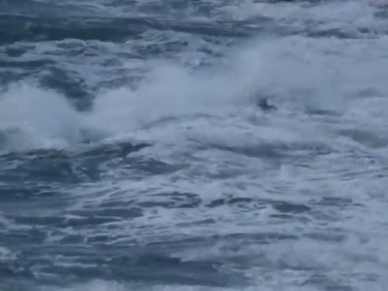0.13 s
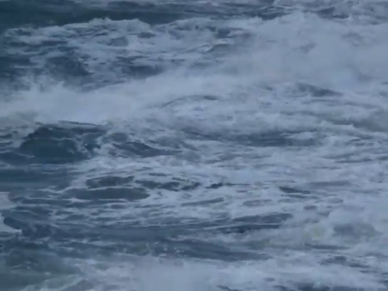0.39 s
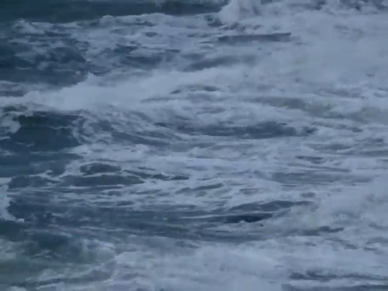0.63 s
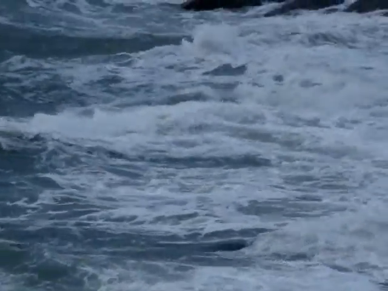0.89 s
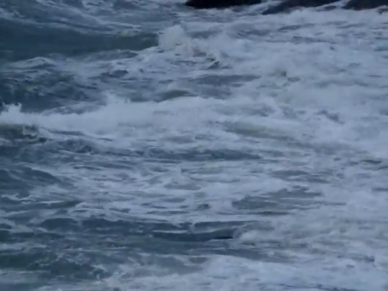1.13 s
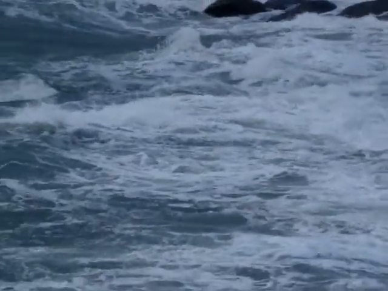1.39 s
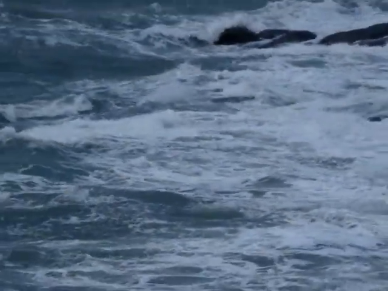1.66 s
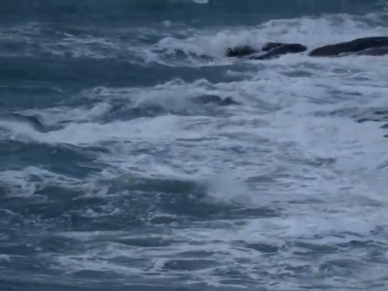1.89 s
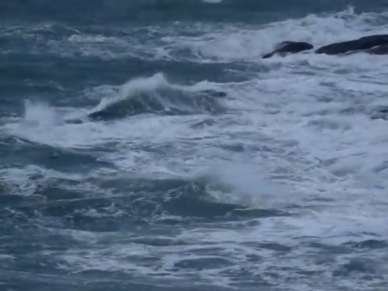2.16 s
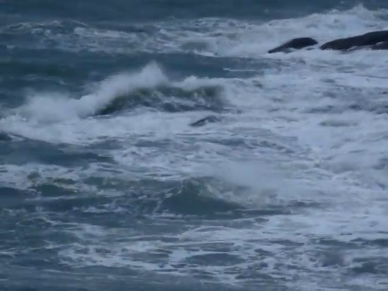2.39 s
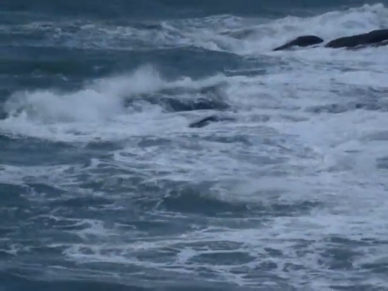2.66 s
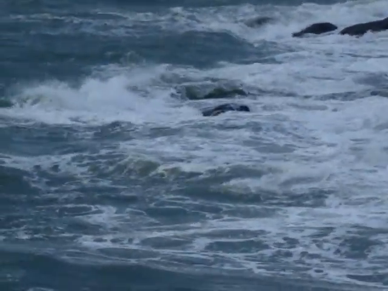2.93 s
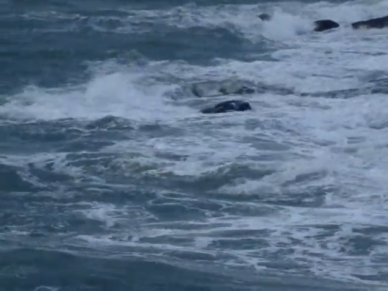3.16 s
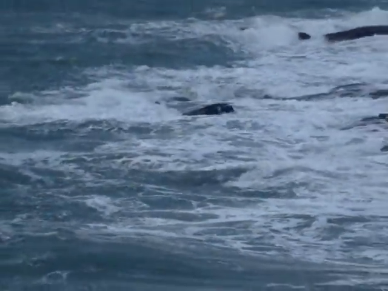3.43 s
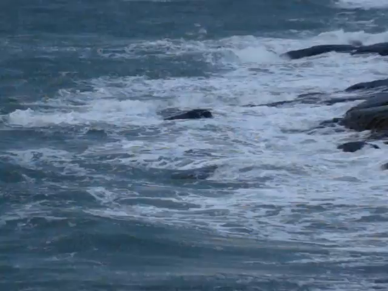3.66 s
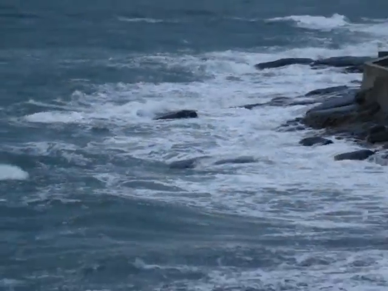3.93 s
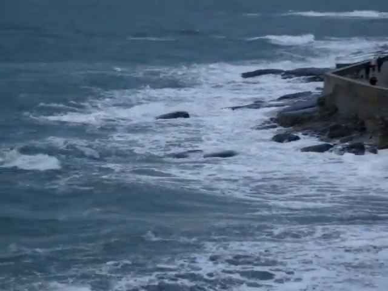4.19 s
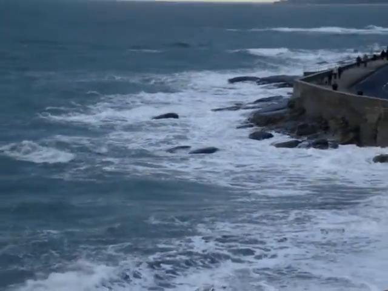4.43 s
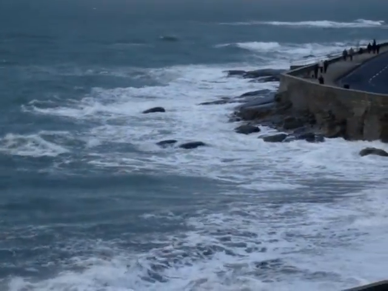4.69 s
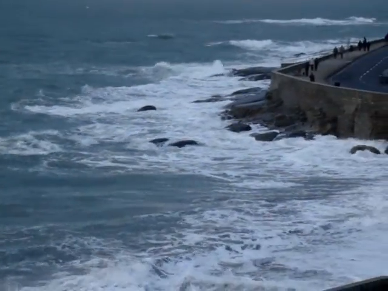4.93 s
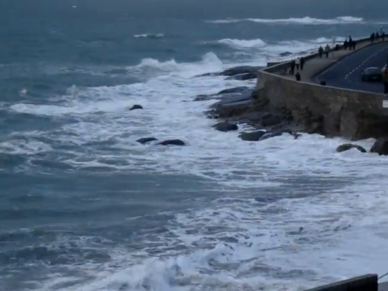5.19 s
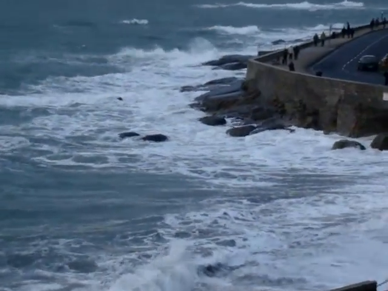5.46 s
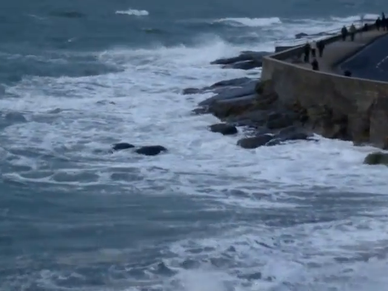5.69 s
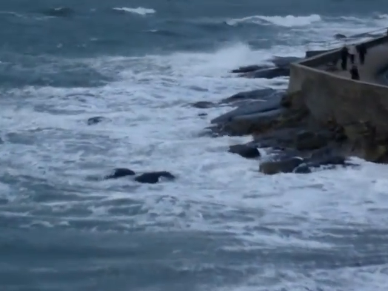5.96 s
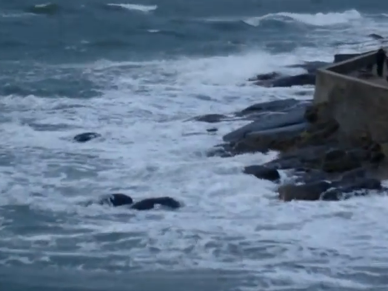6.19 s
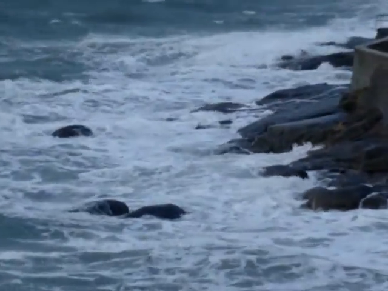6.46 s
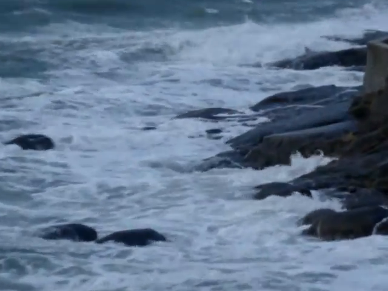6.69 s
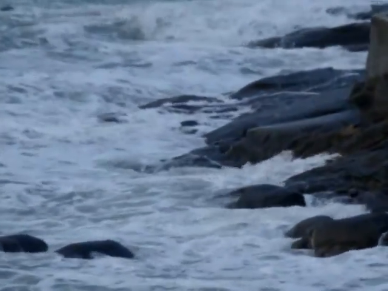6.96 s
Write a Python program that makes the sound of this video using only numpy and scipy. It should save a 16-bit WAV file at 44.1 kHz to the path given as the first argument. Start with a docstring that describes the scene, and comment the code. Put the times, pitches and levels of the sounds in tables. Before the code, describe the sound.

Outdoors on a rough shore, distant waves foam over rocks as a continuous, wide-band hiss, flickering slightly and swelling slowly, with no separate wave crash. For the first 1.5 seconds the surf is alone. Faint wind puffs follow, and from about 2.2 to 2.5 seconds a gust strikes the microphone with lumpy low roar and quick pops; another hits at 2.6 to 2.75. Brief puffs come near 3.1, then dense buffeting and hard pops from 3.3 to 3.7, fading by 3.9. Surf hiss leads again until 5.3, swelling a little just before. Strong pops strike around 5.4 to 5.5, then the heaviest, brighter, fuller roar holds from about 5.65 to 6.15. Shorter gusts thump around 6.2, 6.45 to 6.55 and 6.8 to 7.05. The sound is centred, with little deep rumble, soft overload on the biggest pops and muted extreme treble.

```python
"""Surf and wind gusts at a sea wall

Rough surf breaks and foams over rocks below a sea wall, heard from afar as a wide, swelling hiss:
noise coloured and levelled frame by frame. Gusts of wind strike the single small microphone:
thousands of overlapping pressure swings make a lumpy roar, and single large ones make sharp pops."""
import sys
import numpy as np
from scipy import signal
from scipy.io import wavfile
from scipy.ndimage import uniform_filter1d

SR = 44100
rng = np.random.default_rng(int(sys.argv[2]) if len(sys.argv) > 2 else 0)


def int16_out(signal):
    """Quantize to a 16-bit WAV file."""
    q = np.round(np.clip(np.atleast_2d(signal).T, -1, 1) * 32767)
    wavfile.write(sys.argv[1], SR, q.astype(np.int16))


def magnitude_from_level(level_db):
    """Linear magnitude for a level in decibels (20 dB per decade)."""
    exponent = np.asarray(level_db, float) / 20
    return 10 ** exponent


N = 312669  # samples

# single large eddies: (time [s], size before the swing and the port [dB], swing rate [Hz])
LARGE_EDDIES = [(2.225, -6.5, 860), (2.239, -4, 510), (2.307, -2, 440), (2.336, -3, 380), (2.374, -5, 450),
                (2.39, -6, 650), (2.427, -11, 400), (2.603, -11, 660), (2.628, 0.5, 640), (2.672, -4, 600),
                (2.714, -7.5, 600), (3.106, -9, 325), (3.153, -3, 404), (3.349, -3.5, 507),
                (3.412, -5, 330), (3.471, -2.5, 620), (3.483, -4, 520), (3.522, 3, 637), (3.554, -5, 430),
                (3.558, -5, 1400), (3.567, -6, 400), (3.584, -6, 660), (3.637, -13, 497), (3.802, -18, 300),
                (3.868, -22, 400), (5.414, 1, 520), (5.466, 5, 780), (5.509, -5, 377), (5.633, -1, 835),
                (5.676, -2.5, 650), (5.692, -6, 440), (5.731, -1, 630), (6.118, -17, 800), (6.225, -2, 950),
                (6.373, -16, 450), (6.437, -14, 420), (6.479, -1, 390), (6.511, -18, 600), (6.54, 1, 780),
                (6.581, -5.5, 750), (6.863, -15, 650), (6.908, -7, 500), (6.984, -13, 620),
                (7.044, -21, 300)]


def evened(x):
    """Normalisation: scales a signal to rms 1."""
    return x / np.sqrt(np.mean(x ** 2) + 1e-20)


def wander(t, low_hz, high_hz):
    """Superposition: slow sines of random phase, weaker with rising rate, add to a chance curve of rms 1."""
    rates = np.geomspace(low_hz, high_hz, num=30)
    return evened(sum(np.sin(2 * np.pi * (f * t + rng.random())) / np.sqrt(f) for f in rates))


def scatter(s, size, width_s, swing_hz, phase):
    """Superposition of pulses: adds one bell-shaped pressure swing at each time s."""
    step = np.arange(-350, 350)
    t = step / SR
    bells = np.exp(-0.5 * (t / width_s[:, None]) ** 2)
    swings = bells * np.cos(2 * np.pi * swing_hz[:, None] * t + phase[:, None])
    at = np.clip(np.round(s * SR).astype(int)[:, None] + step, 0, N - 1)
    return np.bincount(at.ravel(), (size[:, None] * swings).ravel(), N)


def through_port(x):
    """High-pass response: the microphone loses the bass of pressure swings."""
    port_hz = 173
    return signal.sosfilt(signal.butter(2, port_hz, "high", fs=SR, output="sos"), x)


def surf():
    """Random superposition: countless bursting bubbles merge into noise, patchy from spray and shifting air."""
    # swell of the foam: (time [s], hiss level above 3 kHz before spray and flicker [dB])
    swell = [(0, -32), (.1, -31.5), (.31, -29), (.81, -30.5), (1.08, -28), (1.5, -28), (1.98, -27.5),
             (2.2, -26.5), (2.4, -29), (2.72, -34.5), (3.0, -29.5), (3.2, -32.5), (3.55, -31.5),
             (3.9, -33.5), (4.11, -31), (4.42, -33), (4.93, -30.5), (5.06, -29.5), (5.29, -26), (5.45, -28),
             (5.75, -35), (5.92, -32), (6.05, -34.5), (6.22, -31.5), (6.44, -38), (6.83, -32), (7.09, -34)]
    # spectrum of the hiss before the port: (frequency [Hz], relative power density [dB])
    spectrum = [(40, -3.5), (110, -10), (170, -10.5), (300, 0), (400, -6), (520, 0.5), (800, -3),
                (1100, -2.5), (2000, -3.5), (2800, -5.5), (4300, -9.5), (7000, -16.5), (10200, -25.5)]
    # how much fine spray hangs in the air: (time [s], gain of the fizz [dB])
    spray = [(0, -3), (1.1, 1.5), (2.1, -0.3), (2.9, 0.3), (4.4, -2.5), (5.3, -0.2), (6.3, 2), (7.09, 1)]
    body_hz, spray_hz = 2280, 6500  # the body of the breakers lies below, the fizz of spray above
    calm_sea_db, body_lag = -29.5, 0.17  # the body misses this share of each swell about this hiss level

    frames, hz = N // 128 + 5, np.fft.rfftfreq(512, 1 / SR)
    t = np.arange(frames) * 128 / SR
    real, imaginary, patches = rng.standard_normal((frames, 257, 3)).T  # each: frequency by time
    patches = uniform_filter1d(patches, size=36, axis=0)
    patches = evened(uniform_filter1d(patches, size=16, axis=1))

    s, hiss_db = np.transpose(swell)
    body_db = body_lag * (calm_sea_db - hiss_db)
    f, colour_db = np.transpose(spectrum)
    colour = magnitude_from_level(np.interp(np.log(hz + 1), np.log(f + 1), colour_db))
    colour /= np.sqrt(np.sum(colour[hz > 3000] ** 2))

    below = 1 / (1 + (hz / body_hz) ** 4)
    above = 1 - 1 / (1 + (hz / spray_hz) ** 6)
    field_db = np.interp(t, s, hiss_db) + below[:, None] * np.interp(t, s, body_db)
    field_db += above[:, None] * np.interp(t, *np.transpose(spray))
    field_db += 0.65 * patches
    field_db += 0.52 * wander(t, 5.4, 80)  # splashes flicker across all bands
    # the factor makes up for the power lost where unrelated frames overlap
    white = (real + 1j * imaginary) * np.sqrt(3 / 2)
    return signal.istft(white * colour[:, None] * magnitude_from_level(field_db), nperseg=512, noverlap=384)[1][:N]


def wind(t):
    """Addition of powers: gusts rise, hold and fall over a breeze; air speed is their power-weighted mean."""
    # gusts: (start of hold [s], hold [s], roar level before clumps and swirl [dB], air speed [m/s])
    gusts = [(1.553, .06, -40, 1.4), (1.72, .04, -35, 1.6), (1.96, 0.12, -38, 1.2),
             (2.157, 0.043, -36, 4.1), (2.211, 0.083, -25, 5.6), (2.3, .12, -25.5, 5),
             (2.435, .09, -29, 3.45), (2.594, .025, -21.5, 4.7), (2.652, .075, -24, 5.3),
             (2.744, 0.026, -30, 3.9), (3.16, 0.012, -25, 4), (3.32, 0.046, -29.5, 2.7),
             (3.392, 0.091, -28, 5), (3.54, .06, -26.5, 6.1), (3.615, 0.054, -27, 8),
             (3.766, 0.033, -29.5, 2.3), (3.868, 0.033, -38, 3.7), (5.3, 0.057, -29, 3),
             (5.363, .12, -32.5, 4.4), (5.518, 0.03, -27.5, 5.3), (5.632, 0.01, -24.5, 4),
             (5.671, 0.011, -20.5, 9.1), (5.715, .025, -20, 12.5), (5.764, 0.09, -19.5, 8.7),
             (5.906, 0.19, -18.5, 11.4), (6.124, 0.026, -20.5, 12), (6.208, 0.034, -30, 8),
             (6.347, .04, -33, 1.5), (6.435, 0.037, -25.5, 5.4), (6.495, 0.031, -23, 6.7),
             (6.559, 0.032, -30, 3.9), (6.612, 0.045, -36.5, 2.3), (6.71, 0.056, -36, 3.2),
             (6.786, 0.029, -29, 5), (6.851, .085, -32.5, 5), (6.992, 0.011, -26, 7),
             (7.04, 0.0064, -25, 3.4)]
    rise_db_per_s, fall_db_per_s = 551, 1302
    breeze_db, breeze_speed = -49.5, 2  # light air between the gusts [dB, m/s]
    start, hold, roar_db, speed = np.transpose(gusts)[:, :, None]
    early, late = np.maximum(start - t, 0), np.maximum(t - start - hold, 0)
    power = magnitude_from_level(2 * (roar_db - rise_db_per_s * early - fall_db_per_s * late))
    breeze = magnitude_from_level(2 * breeze_db)
    total = power.sum(0) + breeze
    air_speed = ((power * speed).sum(0) + breeze * breeze_speed) / total
    return np.sqrt(total), air_speed


def roar():
    """Turbulent convection: eddies of many sizes pass the port; faster air brings more, shorter, brighter ones."""
    eddies_per_s, full_speed = 3000, 11  # passing rate at full speed and above; full speed [m/s]
    eddy_m = 0.0066  # travel of air for one swing of the smallest eddy [m]
    t = np.arange(N) / SR
    coarse = t[::64]
    level, air = wind(coarse)

    draws = rng.random((round(eddies_per_s * N / SR), 5))
    speed = np.clip(np.interp(draws[:, 0] * N / SR, coarse, air), 1, 30)
    busy = np.minimum(speed / full_speed, 1) ** 1.5
    passing = draws[:, 4] < busy  # slower air brings fewer eddies
    when, bigness, phase, strength, _ = draws[passing].T
    speed, busy = speed[passing], busy[passing]

    small = np.exp(-2.1 * bigness)  # 1 for the smallest eddy
    hz = np.maximum(small * speed / eddy_m, 70)
    size = small ** (0.061 + 0.5 * busy) * np.sqrt(hz / busy)
    size *= magnitude_from_level(-2.0 * np.log(1 - 0.99 * strength))  # a few eddies are much stronger
    width_s = (0.13 + 0.15 * busy) / hz  # fast air sheds eddies in short trains, so each swings longer
    eddies = evened(through_port(scatter(when * N / SR, size, width_s, hz, 2 * np.pi * phase)))

    calm = np.maximum(1 - 0.56 * air / full_speed, 0)  # fast air flows more evenly
    clumps = magnitude_from_level(np.interp(t, coarse, 1.4 * calm * wander(coarse, 30, 150)))
    pop_s, pop_db, *_ = np.transpose(LARGE_EDDIES)
    still = 0 * pop_s
    swirl = scatter(pop_s, magnitude_from_level(pop_db - 15.5), 0.0021 + still, still, still)  # large eddies drag small ones
    return eddies * (np.interp(t, coarse, level) * clumps + swirl)


def pops():
    """Pressure dipole: each large eddy is a push and pull, in either order; flutters swing on a little."""
    # eddies that swing on: (time [s], size before the swing and the port [dB], swing rate [Hz],
    # bell width, as standard deviation [swings])
    flutters = [(2.283, -9, 550, 0.6), (3.413, -8.5, 1140, 1.4), (3.616, -6.5, 945, 0.35),
                (5.627, -10.5, 454, 0.78), (6.471, -8, 450, 0.32), (6.92, -5.5, 583, .44)]
    pop_swings = 0.19  # bell width of a single pop, as standard deviation [swings]
    rows = [(*row, pop_swings) for row in LARGE_EDDIES] + [*flutters]
    s, size_db, hz, swings = np.transpose(rows)
    order = np.sign(rng.random(len(s)) - 0.5) * np.pi / 2
    return scatter(s, magnitude_from_level(size_db), swings / hz, hz, order)


def scene():
    """Linear superposition: surf and wind reach one microphone, the same in both channels."""
    return np.tile(through_port(surf() + pops()) + roar(), (2, 1))


def roll_off(x):
    """The treble ends steeply here."""
    return signal.sosfilt(signal.butter(12, 10300, fs=SR, output="sos"), x)


def record(dry):
    """Band limiting and saturation: input coupling cuts rumble, large swings overload softly, treble ends."""
    rumble_hz, edge_hz = 37.7, 10170
    cut = signal.sosfilt(signal.butter(2, rumble_hz, "high", fs=SR, output="sos"), dry)
    soft = 0.8 * np.tanh(cut / 0.8)
    edge = signal.firwin(2047, edge_hz, window=("kaiser", 10), fs=SR)
    mix = signal.oaconvolve(soft, edge[None], "same")
    return roll_off(mix)


dry = scene()
out = record(dry)
int16_out(out)
```